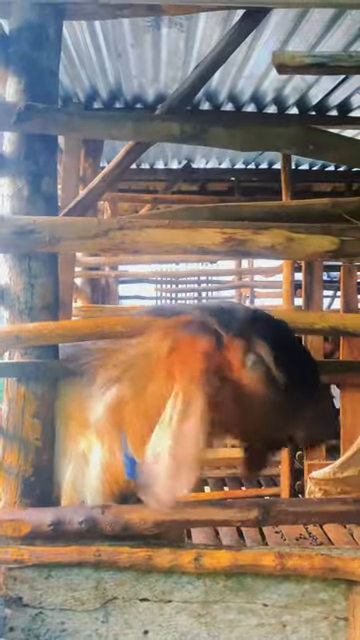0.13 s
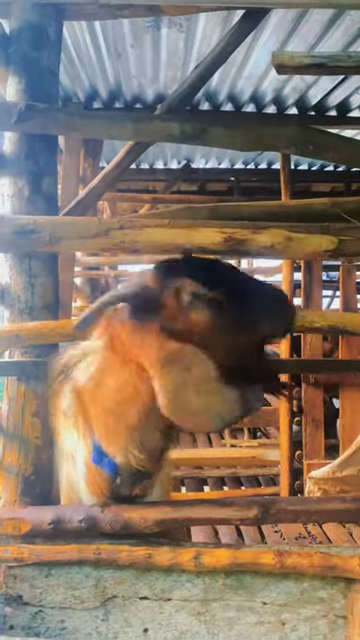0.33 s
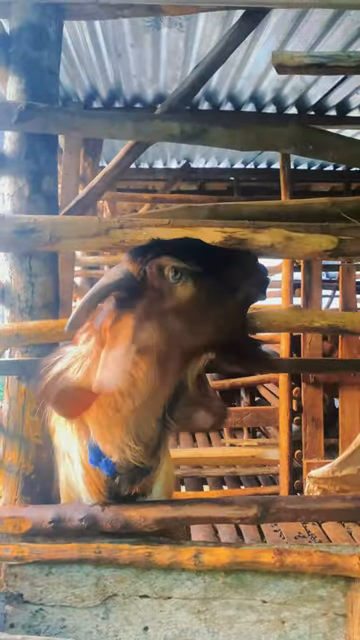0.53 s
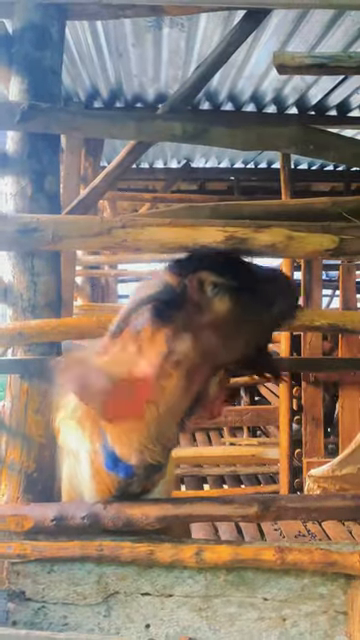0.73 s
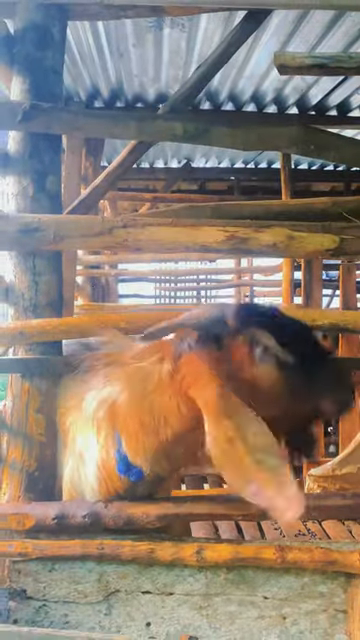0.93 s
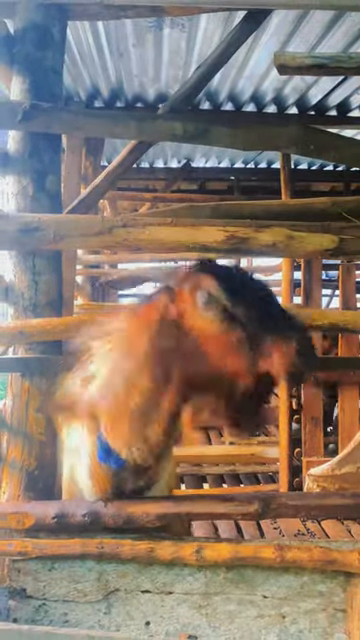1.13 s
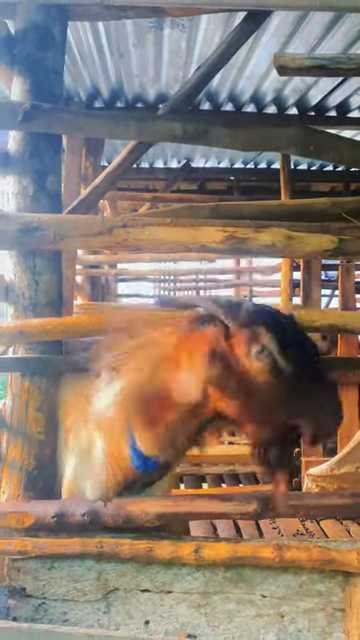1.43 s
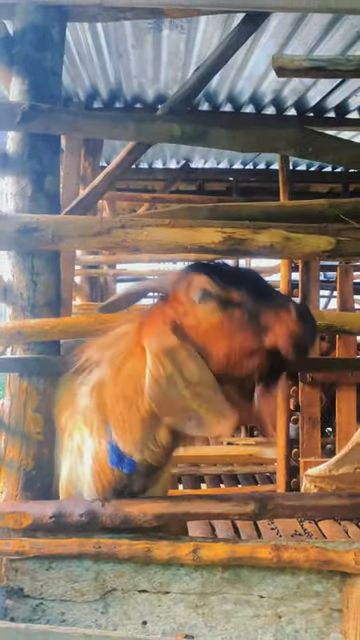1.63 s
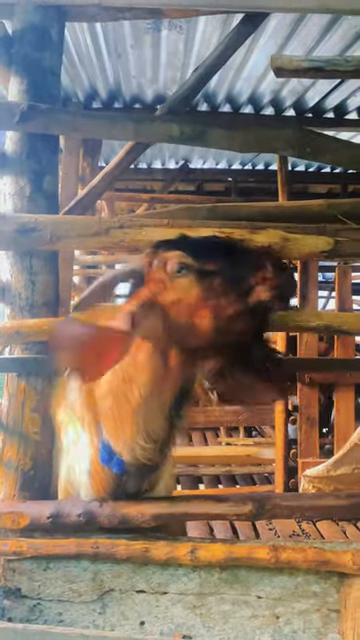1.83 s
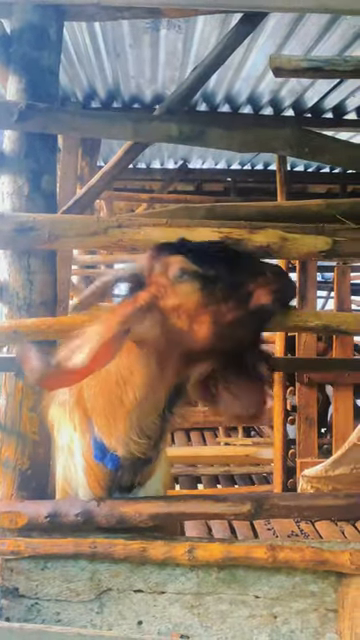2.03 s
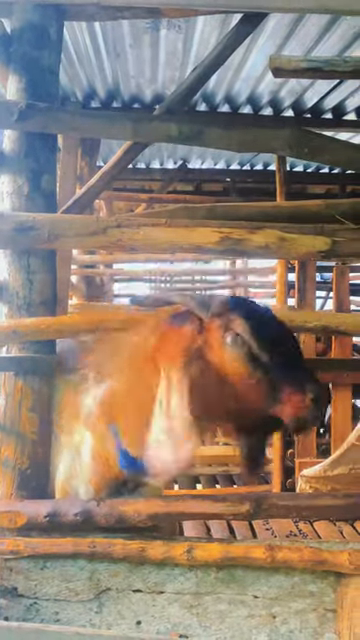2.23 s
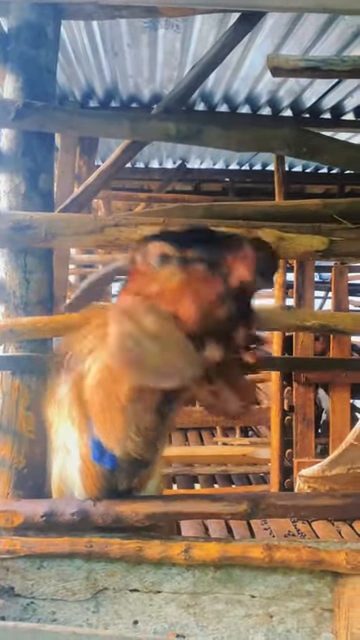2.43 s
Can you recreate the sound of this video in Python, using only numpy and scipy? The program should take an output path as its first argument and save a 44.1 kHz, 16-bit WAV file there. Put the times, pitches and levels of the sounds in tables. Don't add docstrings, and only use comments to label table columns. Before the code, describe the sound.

A soft hoof knock and straw rustle over low engine drone and rumbling air. From about 0.55 to 1.45 seconds a goat gives one loud, nasal bleat, quavering about ten times a second, dropping in pitch at the end, with short pen echo. Knocks follow near 1.4 and 1.9, a clattering cluster at 2.2, with straw and faint bird chirps around 1.5-1.8 and 2.5.

```python
import sys
import numpy as np
from scipy import signal
from scipy.fft import rfft, irfft
from scipy.io import wavfile
from scipy.ndimage import uniform_filter1d

SR = 44100
rng = np.random.default_rng(int(sys.argv[2]) if len(sys.argv) > 2 else 0)


def gain_from_db(level_db):
    decades = np.asarray(level_db, float) / 20
    return 10 ** decades


def dump(signal):
    limited = np.clip(np.atleast_2d(signal).T, -1, 1)
    pcm = np.round(limited * 32767).astype(np.int16)
    wavfile.write(sys.argv[1], SR, pcm)


N = 113778

# (time of crest [s], crest pitch [Hz], level [dB], sag before the next [dB], lip opening [ratio])
BLEAT_THROBS = [(0.566, 353, -92, 2, 1.5), (0.607, 364.7, -47, 21, 0.96), (0.655, 355.1, -60.5, -18, 1.1),
                (0.708, 414, -43.5, 18, 1.02), (0.802, 423.6, -42.5, 15.5, 1.062),
                (0.898, 433.5, -41, 16.5, 1.03), (0.995, 433, -40, 21.5, 1.054),
                (1.089, 429.4, -39.5, 23, 1.0), (1.189, 421.8, -42.5, 16, 1.037),
                (1.292, 398.3, -42, 34.5, 1.018), (1.39, 321.9, -43.5, 35, 0.697),
                (1.48, 324, -100, 11, 4.5)]
# (centre [Hz], width [Hz], level [dB])
THROAT_RESONANCES = [(1174, 141, 5), (2504, 360, -3.5), (3320, 426, -8.5), (1860, 830, -30),
                     (800, 740, -13.5)]
# (frequency [Hz], left minus right [dB])
GOAT_PAN = [(60, 2), (110, 9.5), (200, -14), (380, -9.5), (690, -5), (1280, 14), (2360, 2), (4360, -1)]
# (frequency [Hz], lead [radians])
GOAT_LEAD = [(500, 0.044), (860, 2.44), (1210, 1.8), (1810, 1.3), (2330, 2.48), (2840, 2.56), (3500, 0.96),
             (4200, 0.65)]
# (delay [s], level [dB])
PEN_ECHOES = [(.01083, -3)]
# (time [s], level [dB], brightness [dB], boom [dB], ring [dB], ring tilt [dB])
HOOF_KNOCKS = [(.008, -52, 27, -33, -38, 16), (0.092, -42, 2.5, -5, -3.5, -17),
               (0.859, -41.5, 17, -10.5, -10, -15), (1.195, -41.5, -20, -3, 5, 5),
               (1.419, -36, -29, -35, 1, 8), (1.448, -46, -14, 1.5, 0, 0),
               (1.866, -51, 27, -23, -14.5, 1.5), (1.888, -67, 20, -18, 6, -2),
               (2.168, -37, 1.5, -23, -1.5, 5.5), (2.174, -34, -12, -15, 7, 0),
               (2.197, -34, -16, -18, 8, -3), (2.224, -42, -19, 2.5, 0, -1),
               (2.257, -48.5, -23, 12.5, 0, 4), (2.374, -52, -12, 6.5, 0, -4),
               (2.537, -45.5, 6.5, -4, -4, 2)]
# (frequency [Hz], level [dB], time to fade 60 dB [s])
FLOOR_BOOMS = [(58.4, 1.5, 0.18), (138.6, 4.5, 0.42)]
# (frequency [Hz], level [dB], time to fade 60 dB [s])
SLAT_TONES = [(289.7, 2.5, 0.17), (344, 0.5, 0.089), (537, 0, 0.055), (744, -14, 0.083)]
# (frequency [Hz], level [dB], time to fade 60 dB [s])
SLAT_TICKS = [(1050, -12, .03), (1300, -12, .03), (1950, -12, .03)]
# (time [s], level [dB])
STRAW_STIR = [(0, -52.5), (.05, -59.5), (.2, -62), (.3, -59), (.4, -65), (.46, -68.5), (.55, -65.5),
              (.62, -61), (1.42, -54.5), (1.52, -66), (1.62, -58), (1.72, -66), (1.79, -59.5),
              (1.85, -56.5), (1.95, -65), (2.11, -61), (2.16, -54.5), (2.2, -61), (2.27, -64.5),
              (2.36, -58.5), (2.48, -61.5), (2.58, -58)]
# (frequency [Hz], level [dB per Hz])
STRAW_MID = [(410, -39.5), (700, -3), (803, -8.5), (1390, -5), (1520, -12.5), (1930, -8), (2350, -11),
             (4810, -10.5), (6250, -72), (10600, -120)]
# (frequency [Hz], level [dB per Hz])
STRAW_SIDE = [(410, -25), (700, -11), (1420, -16), (1560, -21.5), (2180, -21.5), (2540, -9), (3930, -23),
              (4810, -16), (6250, -54.5), (10600, -120)]
# (time [s], firing rate [Hz])
ENGINE_SPEED = [(0.0, 36.25), (0.9, 37.18), (0.94, 37.41), (1.95, 37.24), (2.02, 37.95), (2.58, 38.02)]
# (multiple of the firing rate [count], level [dB])
ENGINE_ORDERS = [(1, -34), (2, -7), (3, -5), (4, 1), (5, -1), (6, -3.5), (7, -4), (8, -4), (9, -7.5),
                 (10, -12.5), (11, -5.5), (12, -5.5), (13, -12), (14, -17)]
# (time [s], level [dB])
FLOOR_HUM = [(0, -2), (1.1, 2.5), (1.25, 4), (1.5, 2.5), (1.68, 10), (1.8, 8), (1.95, -6), (2.58, 7)]
# (time [s], length [s], start pitch [Hz], fall [Hz], level [dB])
BIRD_CHIRPS = [(1.568, .068, 4480, 800, -63), (1.592, .04, 3680, 200, -65), (1.738, .055, 4600, 300, -57),
               (1.762, .044, 3850, 600, -62), (1.728, .035, 3650, -150, -67), (1.625, .04, 2850, 150, -67),
               (2.45, .05, 4400, 500, -71), (2.5, .07, 3100, 500, -70), (1.46, .06, 3600, 600, -69),
               (.48, .03, 3100, 50, -69), (.525, .03, 1400, -120, -65)]
# (frequency [Hz], level [dB per Hz])
AIR_MID = [(15, -68.5), (36, -11.5), (230, -12.5), (263, -12.5), (372, -18), (452, -12.5), (509, -28.5),
           (628, -21), (900, -45.5), (1170, -51), (1980, -120)]
# (frequency [Hz], level [dB per Hz])
AIR_SIDE = [(15, -76.5), (25, -43.5), (156, 1), (178, 6), (383, 1.5), (425, 5.5), (900, 1), (1170, -31.5),
            (1980, -120)]
# (frequency [Hz], level [dB per Hz])
HISS_MID = [(4900, -2), (5600, -10), (7300, -3.5), (8200, -13), (8500, -36.5), (11500, -12), (13000, -29),
            (14500, -11), (15700, -25.5)]
# (frequency [Hz], level [dB per Hz])
HISS_SIDE = [(4900, 0.5), (5600, -7.5), (7300, 5.5), (8200, -7.5), (10500, 2.5), (12500, -6), (14500, -26),
             (15700, -22)]
# (time [s], level [dB])
HISS_SWELL = [(0, 6), (.4, 2), (.6, 0.5), (.8, 4.5), (1.15, 4), (1.35, 1.5), (1.6, 0.5), (1.75, -0.5),
              (1.9, 1), (2.58, 1.5)]


def rms_one(x):
    return x / np.sqrt(np.mean(x ** 2) + 1e-20)


def at_hz(points, hz):
    point_hz, value = np.transpose(points)
    return np.interp(np.log(hz + 1), np.log(point_hz), value)


def in_time(rows):
    return np.interp(np.arange(N) / SR, *np.transpose(rows))


def drift(rate):
    r = np.exp(-80 * np.pi * rate / SR)
    steps = rng.standard_normal(N // 40 + 2002)
    slow = signal.lfilter([1], [1, -2 * r, r * r], steps)[2000:]
    return np.interp(np.arange(N) / 40, np.arange(len(slow)), rms_one(slow))


def ring(clicks, hz, t60):
    r = np.exp(-np.log(1000) / (t60 * SR))
    w = 2 * np.pi * hz / SR
    return signal.lfilter([0, np.sin(w)], [1, -2 * r * np.cos(w), r * r], clicks + 1e-18)


def band_noise(low, high):
    band = signal.butter(2, [low, high], "band", fs=SR, output="sos")
    return signal.sosfilt(band, rng.standard_normal((2, N)))


def patchy_noise(spectrum, patchy_db, rate):
    hz = np.fft.rfftfreq(N, 1 / SR)
    low, high = spectrum[0][0], spectrum[-1][0]
    white = rfft(rng.standard_normal(N)) * gain_from_db(at_hz(spectrum, hz)) * (hz > low) * (hz < high)
    half_octave = 2 * np.log2(hz + 1)
    together = drift(rate)
    out = 0
    for k in range(int(2 * np.log2(low)), int(2 * np.log2(high)) + 2):
        band = irfft(white * np.clip(1 - abs(half_octave - k), 0, 1), N)
        out = out + band * gain_from_db(patchy_db * (.5 * together + drift(rate)))
    return rms_one(out)


def two_ports(mid, side):
    return mid + np.array([[1], [-1]]) * side


def throat(hz):
    return sum(gain_from_db(db) / (1 + (2 * (hz - centre) / width) ** 2) for centre, width, db in THROAT_RESONANCES)


def bleat():
    slack_hz, open_hz = 339.9, 425
    s, crest_hz, db, sag_db, lips = np.transpose(BLEAT_THROBS)
    turn = np.interp(np.arange(N) / SR, s, np.arange(len(s)))
    nearest = np.round(turn).astype(int)
    crest_hz = uniform_filter1d(crest_hz[nearest], size=900)
    lips = uniform_filter1d(lips[nearest], size=900)

    since, push = np.modf(np.minimum(turn + 0.32, len(s) - 1))
    push = push.astype(int)
    db = uniform_filter1d(db[push], size=400)
    dip_db = uniform_filter1d(-sag_db[push] * since ** (2 * 1.21), size=300)

    sag_hz = .6 * np.clip(crest_hz - slack_hz, 0, None) * abs(np.sin(np.pi * turn)) ** (2 * 1.1)
    pitch = (crest_hz - sag_hz) * (1 + .0035 * drift(78))
    phase = 2 * np.pi * np.cumsum(pitch) / SR
    jaw = (crest_hz / open_hz) ** .5
    bright_db = 8 * (jaw - 1) + .2 * (.4 * dip_db - .2 * sag_hz)
    voice = 0
    for k in range(2, 13):
        opening = jaw if k < 5 else lips
        tone = np.sin(k * phase + k * k + .04 * k * drift(90))
        level = gain_from_db(bright_db * np.log2(k / 3) + 1.6 * drift(50))
        voice = voice + throat(k * pitch / opening) * tone * level

    hz = np.fft.rfftfreq(N, 1 / SR)
    puffs = rng.standard_normal(N) * (1 + np.sin(phase))
    breath = rms_one(irfft(rfft(puffs) * throat(hz) * (hz / 1000) ** 1.8, N))
    return np.sqrt(2) * gain_from_db(db + dip_db) * (voice + gain_from_db(-22) * lips ** 2.6 * breath)


def pen(x):
    t60_s, tail_db = .24, -15
    hz, t = np.fft.rfftfreq(N, 1 / SR), np.arange(N) / SR
    near = 1 + sum(gain_from_db(db) * np.exp(-2j * np.pi * hz * s) for s, db in PEN_ECHOES)
    tail = rng.standard_normal((3, N)) * gain_from_db(-60 * t / t60_s) * (t > .012)
    tail = rfft((tail[0] + 2.07 * tail[1:]) / np.sqrt(np.sum(tail[0] ** 2)))
    far = gain_from_db(tail_db) * np.clip(hz / 1200, .5, 2.4) * tail
    half = np.array([[.5], [-.5]])
    ports = gain_from_db(half * at_hz(GOAT_PAN, hz)) * np.exp(1j * half * at_hz(GOAT_LEAD, hz))
    return irfft(rfft(x) * ports * (near + far), N)


def knocks():
    body_lag_s, soft_s, crack_t60_s, crack_db = .002, 0.0025, 0.054, -11
    s, db, bright_db, boom_db, ring_db, tilt_db = np.transpose(HOOF_KNOCKS)
    at = (s * SR).astype(int)
    out = np.zeros(N)

    def clicks(level_db, lag=0):
        return np.bincount(at + lag, gain_from_db(level_db), N)

    for modes, extra_db in ((FLOOR_BOOMS, boom_db), (SLAT_TONES, 0)):
        for hz, mode_db, t60 in modes:
            chance_db = rng.normal(0, 2.5, len(s))
            push = clicks(db + mode_db + extra_db + chance_db, int(body_lag_s * SR))
            softness = 1 + int(soft_s * SR * np.sqrt(50 / hz))
            out += ring(uniform_filter1d(push, size=softness), hz, t60)
    for hz, mode_db, t60 in SLAT_TICKS:
        tilt = tilt_db * 2 * np.log2(hz / 1400)
        out += ring(clicks(db + mode_db + bright_db + ring_db + tilt), hz, t60)
    decay = np.exp(-np.log(1000) / (crack_t60_s * SR))
    fade = signal.lfilter([1], [1, -decay], clicks(db + bright_db + crack_db))
    return out + fade * band_noise(700, 4800)


def snap():
    at_s, width_s = 1.866, .012
    shape = np.exp(-((np.arange(N) / SR - at_s) / width_s) ** 2)
    burst = rng.standard_normal((2, N)) * shape
    band = signal.butter(2, [5000, 12500], "band", fs=SR, output="sos")
    return gain_from_db(-60.5) * signal.sosfilt(band, burst)


def straw():
    mid = patchy_noise(STRAW_MID, patchy_db=-2.5, rate=16.0)
    side = patchy_noise(STRAW_SIDE, patchy_db=-3.0, rate=12.0)
    still_db = -84
    return np.hypot(gain_from_db(in_time(STRAW_STIR)), gain_from_db(still_db)) * two_ports(mid, side)


def engine():
    pan_db, waver_db = -1.76, 2.5
    phase = 2 * np.pi * np.cumsum(in_time(ENGINE_SPEED)) / SR
    hum = 0
    for k, db in ENGINE_ORDERS:
        floor_db = (k == 7) * in_time(FLOOR_HUM)
        level = gain_from_db(db + floor_db + waver_db * drift(2.33))
        hum = hum + level * np.sin(k * phase + 0.87 * drift(3.56) + 0.1525 * k * k)
    return gain_from_db(-50) * hum * gain_from_db([[pan_db / 2], [-pan_db / 2]])


def bird():
    out = np.zeros((2, N))
    for s, length, hz, fall_hz, db in BIRD_CHIRPS:
        u = np.clip((np.arange(N) / SR - s) / length, 0, 1)
        phase = 2 * np.pi * np.cumsum(hz - fall_hz * u ** 2.5) / SR
        out += gain_from_db(db) * np.sqrt(abs(np.sin(np.pi * u))) * np.sin(phase + [[0], [1.2]])
    return out


def air():
    mid = gain_from_db(-48.5) * patchy_noise(AIR_MID, patchy_db=1.7, rate=23.0)
    side = gain_from_db(-57.5) * patchy_noise(AIR_SIDE, patchy_db=6.0, rate=4.0)
    return two_ports(mid, side)


def hiss():
    mid = gain_from_db(-80) * patchy_noise(HISS_MID, patchy_db=1.5, rate=13.0)
    side = gain_from_db(-75) * patchy_noise(HISS_SIDE, patchy_db=-3.0, rate=2.9)
    return gain_from_db(in_time(HISS_SWELL)) * two_ports(mid, side)


def scene():
    mic_cut_hz = 4960
    near = pen(bleat()) + knocks() + straw() + engine() + bird() + air()
    dull = signal.cheby2(8, 45, 1.174 * mic_cut_hz, fs=SR, output="sos")
    return signal.sosfilt(dull, near) + snap() + hiss()


def roll_off(x):
    return signal.sosfilt(signal.butter(12, 15750, fs=SR, output="sos"), x)


def record(dry):
    return roll_off(dry)


dry = scene()
out = record(dry)
dump(out)
```